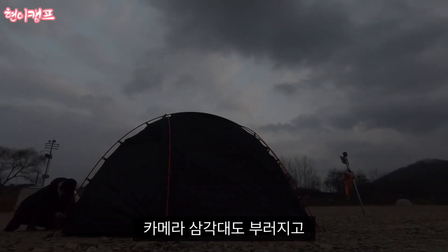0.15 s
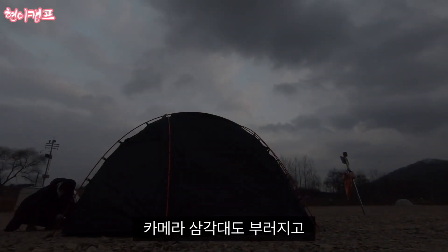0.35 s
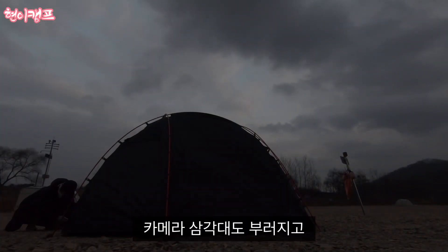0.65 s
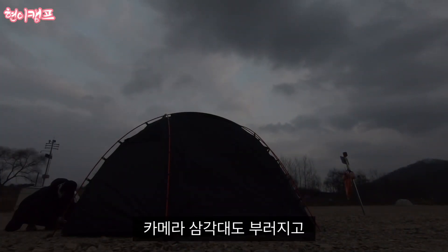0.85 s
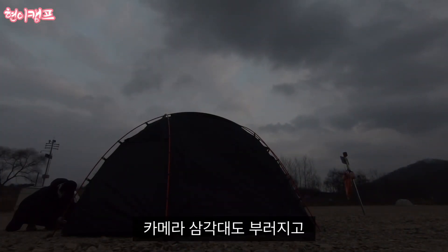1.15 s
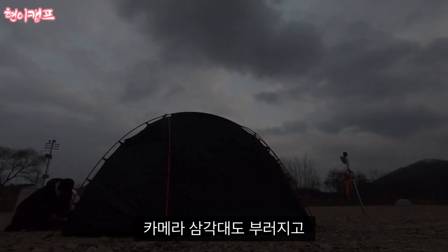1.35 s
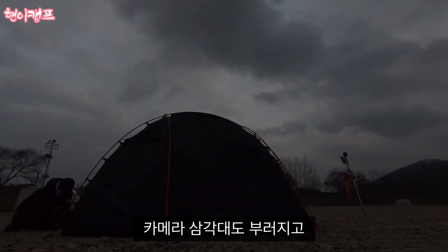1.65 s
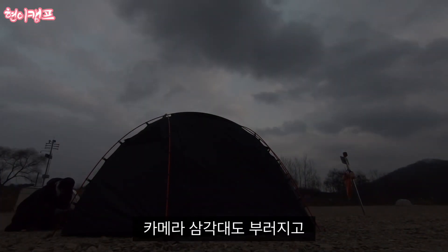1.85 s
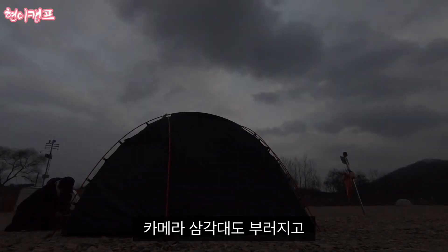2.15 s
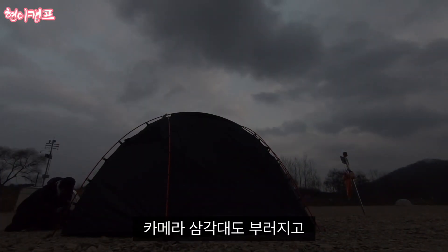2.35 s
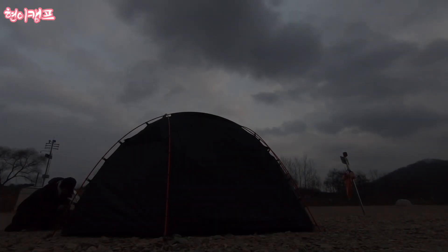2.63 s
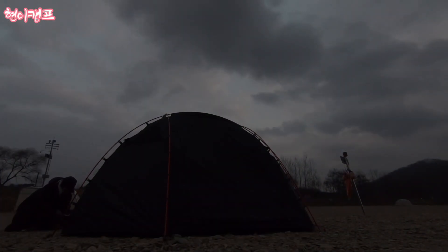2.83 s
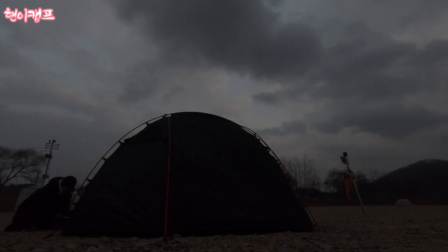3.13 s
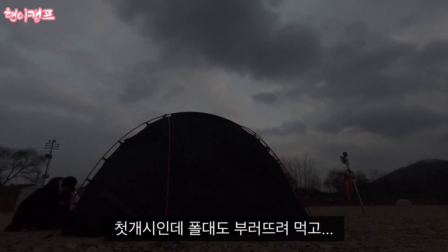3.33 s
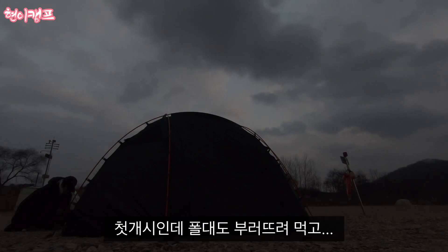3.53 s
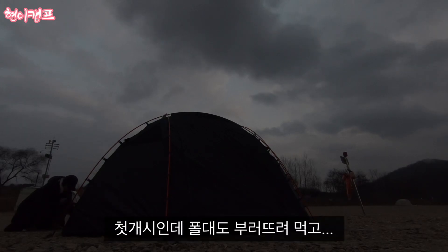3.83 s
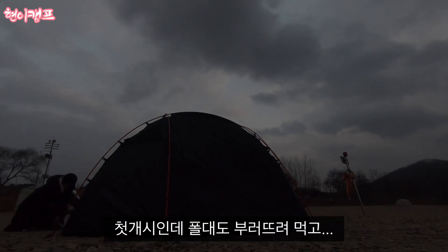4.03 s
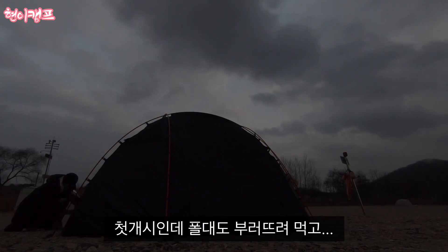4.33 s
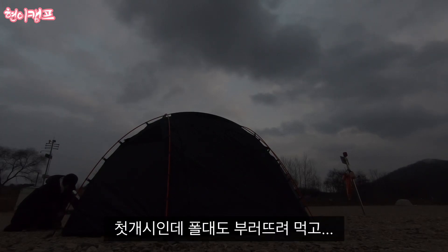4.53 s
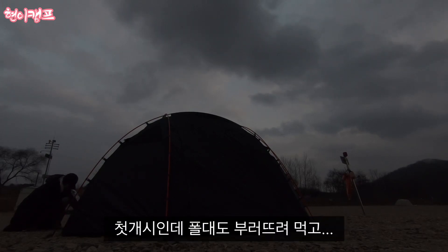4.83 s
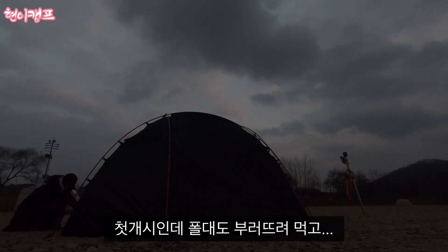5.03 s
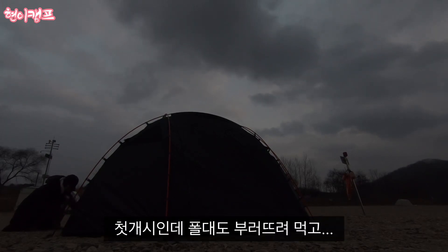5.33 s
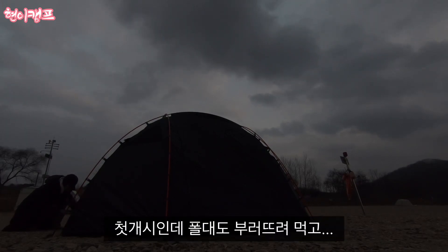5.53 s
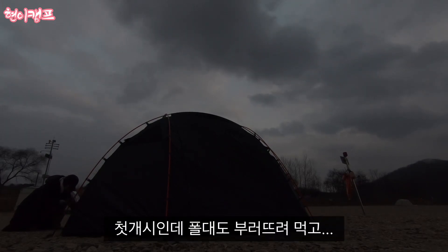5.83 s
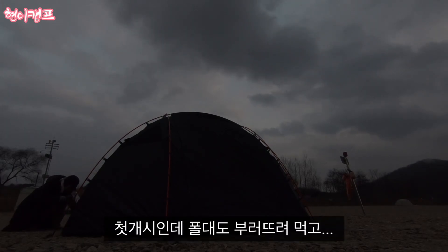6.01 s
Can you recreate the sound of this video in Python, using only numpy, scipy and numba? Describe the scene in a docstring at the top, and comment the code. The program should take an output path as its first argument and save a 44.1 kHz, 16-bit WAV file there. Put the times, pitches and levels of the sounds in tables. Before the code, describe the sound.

Outdoors, rumbling wind and gravel crunches drop suddenly at a click; a steel tent peg is then hammered steadily into stony ground amid gusts.

```python
"""Wind buffets the two microphone ports, the left one most, while gravel crunches.
At 1.36 s a click is heard, the wind noise is suddenly faint, then builds. A steel tent peg is hammered into
gravelly ground a few metres off on an open field: noise cracks, ringing steel modes, a soil thump, a short tail.
More gravel stirs between blows, a sleeve swishes with each swing, far traffic hums below; these and
the wind are shaped noise."""
import sys
import numpy as np
from scipy import signal
from scipy.fft import rfft, irfft
from scipy.io import wavfile
from numba import njit

SR = 44100
rng = np.random.default_rng(int(sys.argv[2]) if len(sys.argv) > 2 else 0)


def inscribe(sig):
    """Save sig as 16-bit PCM at rate SR to the path in sys.argv[1].

    A 1-D sig is mono; a 2-D sig holds one channel per row.
    Samples are clipped to [-1, 1] before scaling.
    """
    pcm = np.round(np.clip(np.atleast_2d(sig).T, -1, 1) * 32767)
    wavfile.write(sys.argv[1], SR, pcm.astype(np.int16))


N = 272097

STEP_S = 1.3616      # a click is heard and the wind noise is suddenly faint
# hammer blows: start_s [s], crack_db [dB], peg ring mid_db at 2-4 kHz [dB], high_db above 4 kHz [dB],
# hammer head ring head_db [dB], sleeve swish_db [dB]
BLOWS = [(1.7522, -26, -34, -33.5, -51.5, -69), (2.0845, -18, -33.5, -32.5, -50, -74),
         (2.4238, -22, -36, -27, -52, -71.5), (2.7483, -20.5, -45.5, -29, -56, -70),
         (3.0775, -21.5, -51, -29, -47.5, -72.5), (3.575, -20.5, -42.5, -34.5, -41.5, -66),
         (3.997, -18, -33, -33.5, -50, -63), (4.558, -20.5, -36, -45, -63.5, -69),
         (4.9835, -21.5, -37.5, -40.5, -47, -65.5), (5.4171, -20.5, -31.5, -34, -41.5, -69)]
# spectrum of steel striking steel, relative: pitch_hz [Hz], level_db [dB per Hz]
CRACK_SPECTRUM = [(350, -23), (600, 1.5), (900, -19.5), (1300, -8), (2000, -16), (2800, -3), (4000, -5.5),
                  (5300, -2.5), (7300, -5.5), (8600, -16.5), (10500, -17.5), (12400, -20), (13300, -45.5),
                  (16000, -56.5)]


def amp(db):
    """Amplitude factor for a level in dB."""
    return 10 ** (np.asarray(db) / 20)


def rms_one(x):
    """Signal scaled to rms 1."""
    return x / np.sqrt(np.mean(x ** 2) + 1e-20)


def in_time(rows):
    """Straight lines between table rows; the first column is time in s."""
    start_s, *columns = np.transpose(rows)
    return [np.interp(np.arange(N) / SR, start_s, column) for column in columns]


def at_hz(points, hz, axis=1):
    """A table column read at any pitch, in straight lines over log pitch."""
    points = np.array(points)
    return np.interp(np.log(hz), np.log(points[:, 0]), points[:, axis])


def pass_band(order, edge_hz, kind, x):
    """Butterworth filter, high pass or band pass."""
    return signal.sosfilt(signal.butter(order, edge_hz, kind, fs=SR, output="sos"), x)


def drift(rate_hz):
    """Slow chance with spread 1: noise through two equal low passes, computed at every 40th sample."""
    pole = np.exp(-80 * np.pi * rate_hz / SR)
    white = rng.standard_normal(N // 40 + 2002)
    slow = signal.lfilter([1], [1, -2 * pole, pole * pole], white)[2000:]      # skip the filter's start
    return np.interp(np.arange(N) / 40, np.arange(len(slow)), rms_one(slow))


def coloured(white, spectrum):
    """Noise given a spectrum; rms 1."""
    hz = np.maximum(np.fft.rfftfreq(N, 1 / SR), 1)
    return rms_one(irfft(rfft(white) * amp(at_hz(spectrum, hz)), N))


def clicks(times_s, sizes):
    """Single-sample clicks; the tiny floor keeps decaying filters off denormal numbers."""
    out = np.full(N, 1e-18)
    out[np.round(np.asarray(times_s) * SR).astype(int)] = sizes
    return out


def dying(x, t60_s):
    """Envelope that jumps at each click and falls by 60 dB in t60_s."""
    return signal.lfilter([1], [1, -amp(-60 / (t60_s * SR))], x)


def struck(times_s, levels_db, modes, spread_db, detune):
    """Every blow rings every mode with a strength, pitch and damping a little of its own."""
    out, t = np.zeros(N), np.arange(SR // 5) / SR
    mode_hz, mode_db, t60_s = np.transpose(modes)
    contact = 1 - np.exp(-t / 0.00021)      # the contact takes a moment
    chances = rng.standard_normal((len(times_s), 3, len(modes), 1))
    for start_s, level_db, (loud, sharp, long) in zip(times_s, levels_db, chances):
        fall_db = 60 * t / (t60_s[:, None] * amp(.5 * long))
        turns = mode_hz[:, None] * (1 + detune * sharp) * t
        ring_db = (level_db + mode_db)[:, None] + spread_db * loud - fall_db
        rings = amp(ring_db) * np.sin(2 * np.pi * turns)
        out[round(start_s * SR):][:len(t)] += contact * rings.sum(axis=0)
    return out


def crack_of_steel(start_s, hit, looseness):
    """Noise bursts: a sharp crack, then a ragged rattle of grit; a loose peg cracks thinly."""
    ragged = amp(4.8 * drift(180))      # grit shifts in fits and starts
    rattle = amp(-12.5) * dying(hit, .03) + amp(-18.5) * dying(hit, 0.11)
    burst = amp(-4.5) * dying(hit, 0.0041) + ragged * rattle
    full = coloured(rng.standard_normal(N), CRACK_SPECTRUM) * burst
    thin = pass_band(2, 1150, "high", full)
    return full + (thin - full) * np.interp(np.arange(N) / SR, start_s, looseness)


def peg_ring(start_s, low_db, mid_db, high_db):
    """Ringing modes of the steel peg; stones touch the shank and roughen its ring."""
    # modes of the peg: pitch_hz [Hz], level_db [dB, relative], t60_s [s]
    peg_modes = [(1245, -1, 0.05), (1320, -2.5, 0.013), (1413, -11, 0.046), (1565, -8.5, 0.01),
                 (1633, -6, 0.027), (1940, -10, 0.04), (2180, -8.5, 0.0092), (2737, -4.5, 0.082),
                 (2798, -3.5, .055), (3011, -6.5, 0.089), (3110, -8.5, 0.046), (3470, -8, 0.038),
                 (3540, -6, .05), (3680, -4, 0.019), (4430, -9.5, .04), (4760, -2, 0.023),
                 (4810, -8.5, 0.091), (5210, -1, 0.035), (5500, -9, 0.029), (6966, -3, 0.041),
                 (7210, -5.5, 0.032), (7600, -10.5, 0.023)]
    hz = np.array(peg_modes)[:, 0]
    upper_db = np.where(hz < 4000, mid_db[:, None], high_db[:, None])
    level_db = np.where(hz < 2000, low_db[:, None], upper_db)
    peg = struck(start_s, level_db, peg_modes, spread_db=2, detune=.004) * amp(2 * drift(100))
    return pass_band(3, [1000, 9500], "band", peg)


def head_ring(start_s, head_db):
    """High ring of the hammer head, its level wavering slightly."""
    # modes of the hammer head: pitch_hz [Hz], level_db [dB, relative], t60_s [s]
    head_modes = [(9212, 8.5, 0.066), (10100, -6.5, .04), (12000, -16, .06), (12400, -17.5, .06),
                  (14790, -27, .06)]
    return struck(start_s, head_db, head_modes, spread_db=3.5, detune=0.00087) * amp(0.93 * drift(60))


def soil_thump(start_s, thump_db):
    """Low, quickly damped modes of the soil, a moment after each contact."""
    # modes of the soil round the peg: pitch_hz [Hz], level_db [dB, relative], t60_s [s]
    ground_modes = [(184.2, -3.5, .07), (258, -7.5, 0.036), (454, -12.5, 0.023)]
    soil = struck(start_s + 0.0017, thump_db, ground_modes, spread_db=3.0, detune=.03)
    return pass_band(2, [110, 700], "band", soil)


def hammer():
    """Crack, peg and head ring with one ground echo, over a soil thump; the soil grips the sinking peg."""
    start_s, crack_db, mid_db, high_db, head_db, _ = np.transpose(BLOWS)
    sunk = np.arange(len(start_s))      # blows so far
    looseness = np.exp(-sunk / 2.65)
    full_thump_db, first_thump_db = -14.5, -38.5
    thump_db = full_thump_db + (first_thump_db - full_thump_db) * looseness
    low_db = -32 - 1.22 * sunk      # the soil damps the low ring
    hit = clicks(start_s, amp(crack_db))
    steel = crack_of_steel(start_s, hit, looseness) + peg_ring(start_s, low_db, mid_db, high_db)
    steel += head_ring(start_s, head_db)
    lag = round(0.0053 * SR)
    steel[lag:] += amp(-12.5) * steel[:-lag].copy()      # echo off the ground
    return steel + soil_thump(start_s, thump_db), hit


def scatter(hit):
    """Tent and ground scatter each blow into a short tail, different on each side."""
    swell = signal.lfilter([.006], [1, -.994], dying(hit, 0.082))
    return amp(-19.5) * swell * coloured(rng.standard_normal((2, N)), CRACK_SPECTRUM)


def gravel():
    """Each crunch is a decaying burst of ragged grit noise in a broad band, a quarter second at most."""
    # crunches: start_s [s], level_db before the band filter [dB], pitch_hz near mid-band [Hz], t60_s [s]
    crunches = [(0.218, -64, 4000, 0.97), (0.251, -42.5, 5370, 0.056), (.284, -56, 5440, 0.04),
                (0.299, -48, 4900, 0.02), (0.302, -43, 3230, 0.091), (0.325, -57, 3060, 0.12),
                (0.347, -53, 3580, 0.034), (0.463, -48.5, 5600, 0.025), (0.474, -64, 3650, 0.44),
                (.509, -62, 4000, 0.018), (0.648, -59, 5850, 0.094), (3.15, -60, 4000, 0.089),
                (4.159, -71.5, 6000, 0.24), (5.554, -66.5, 3070, 0.023), (5.888, -72, 3500, 0.15),
                (6.048, -71, 3500, 0.15)]
    grit = rng.standard_normal(N) * amp(2.5 * drift(300))
    out = np.zeros(N)
    for start_s, level_db, pitch_hz, t60_s in crunches:
        i = round(start_s * SR)
        piece = grit[i:i + SR // 4]
        band = pass_band(2, [pitch_hz / 1.45, pitch_hz * 1.6], "band", piece)
        fall_db = 60 * np.arange(len(piece)) / SR / t60_s
        out[i:i + len(piece)] += amp(level_db - fall_db) * band
    return out


def from_left(x):
    """The two ports hear the peg's corner with a level and phase gap that depend on pitch."""
    # sound from the left: pitch_hz [Hz], left_over_right_db [dB], left_lead_rad [rad]
    sides = [(100, 0, 0), (500, -1, .3), (950, 7.5, .4), (1900, 7, .1), (3800, 3.5, .1), (5500, 0, .8),
             (7500, -4.5, 1.9), (9200, -8, 2.1), (12000, -1, 2.6)]
    hz = np.maximum(np.fft.rfftfreq(N, 1 / SR), 1)
    # each port takes half of either gap
    half = amp(at_hz(sides, hz) / 2) * np.exp(.5j * at_hz(sides, hz, axis=2))
    return irfft(rfft(x) * np.array([half, 1 / half]), N)


@njit
def eddies(push, step, damping, smooth):
    """A broad resonance and two smoothing stages that follow the eddy pitch."""
    out, low, band, a, b = np.zeros(len(push)), 0., 0., 0., 0.
    for i in range(len(push)):
        band += step[i] * (push[i] - low - damping * band)
        low += step[i] * band
        a += smooth * step[i] * (low - a)
        b += smooth * step[i] * (a - b)
        out[i] = b / np.sqrt(step[i])
    return out


def buffeting(hz, lumps, lumps_db, damping, smooth, floor_hz):
    """Lumpy pressure on one port: stronger lumps come from faster eddies and are higher; rms 1."""
    push = rng.standard_normal(N) * amp(lumps_db * lumps)
    step = 2 * np.pi * hz * amp(0.75 * lumps + 0.77 * drift(14)) / SR      # rad per sample
    return rms_one(pass_band(1, floor_hz, "high", eddies(push, step, damping, smooth)))


def gusts():
    """Each gust is a bell-shaped change of level on both ports and on the sharp edge, in dB."""
    # gusts out of the rumble: start_s of the bell's middle [s], left_rise_db [dB], right_rise_db [dB],
    # sharp_db, extra sharp edge [dB]
    gust_rows = [(0.099, 7, 2, 0), (0.66, 9.5, 9, 9), (1.131, -1, 5.5, -5), (1.22, 2.5, -1, -5),
                 (2.3, -4.5, 18, 2.5), (2.72, 2, 1, 7.5), (2.86, 7, -0.5, 4.5), (3.17, 5, 1, 0.5),
                 (4.21, 7, -0.5, 10), (4.59, 3.5, 1.5, 9.5), (4.861, 1.5, -1, 7.5), (5.26, 2.5, 0, 5),
                 (5.73, 0, -0.5, 9.5), (5.891, 5.5, 7.5, 12), (6.05, 5, 6, -5)]
    middle_s, *rises_db = np.transpose(gust_rows)
    half_width_s = 0.046
    bells = np.exp(-((np.arange(N) / SR - middle_s[:, None]) / half_width_s) ** 2)
    return np.array(rises_db) @ bells


def wind():
    """Each port has its own eddies; the stereo widening puts each one, thin and inverted, on the other side."""
    # wind before and after the step in level, ahead of gusts: start_s [s], left_db [dB],
    # pitch_hz of left eddies before scaling [Hz], right_db [dB]
    wind_before = [(0.0, -34.5, 135, -43), (0.26, -29.5, 133, -48.5), (0.4, -31, 115, -49.5),
                   (0.52, -24.5, 108, -47), (0.76, -33.5, 128, -44), (0.88, -27.5, 110, -37),
                   (1.02, -33.5, 110, -43.5), (1.36, -24, 100, -33.5)]
    wind_after = [(1.362, -67, 60.14, -71.5), (1.84, -63, 45.02, -72), (1.97, -44, 45.1, -47),
                  (2.17, -31.5, 52, -42.5), (2.4, -32, 80.2, -37), (2.6, -34, 128.6, -49),
                  (2.93, -32, 111.8, -45), (3.15, -31, 104.1, -53), (3.25, -40.5, 109.8, -52),
                  (3.35, -27.5, 103, -58), (3.53, -39.5, 109.7, -56), (3.67, -30.5, 109.4, -48.5),
                  (3.87, -38, 118.2, -54.5), (4.0, -25, 126.4, -44), (4.2, -27.5, 142.7, -46.5),
                  (4.33, -41, 151.5, -58), (4.53, -31, 134.3, -50), (4.8, -35.5, 130.6, -60),
                  (5.05, -31.5, 128.9, -47), (5.4, -27, 116.4, -48), (5.65, -32, 150, -57.5),
                  (5.82, -31, 140.4, -51.5), (6.0, -26, 138.1, -43.5), (6.17, -23.5, 122.4, -46)]
    before = np.arange(N) / SR < STEP_S
    left_db, hz, right_db = np.where(before, in_time(wind_before), in_time(wind_after))
    left_rise_db, right_rise_db, sharp_db = gusts()
    left_db, right_db = left_db + left_rise_db, right_db + right_rise_db

    # sharp edge against the left port, stronger for fast eddies: 17.5 dB per octave
    edge_db = left_db - 28 + 17.5 * np.log2(hz / 124) + sharp_db
    left_hz = 1.151 * hz * 2 ** (.02 * sharp_db)      # sharper gusts are higher
    lumps = np.tanh(drift(43) / 2) * 2
    left = amp(left_db) * buffeting(left_hz, lumps, lumps_db=3.5, damping=0.67, smooth=0.95, floor_hz=66)
    left += amp(edge_db) * buffeting(250, lumps, lumps_db=4, damping=.8, smooth=1.5, floor_hz=200)

    right_hz = 70 * amp(0.2 * (right_db + 43.5))      # stronger wind is higher
    right_lumps = np.tanh(drift(23) / 2) * 2
    right = amp(right_db) * buffeting(right_hz, right_lumps, lumps_db=4.5, damping=0.27, smooth=2.4,
                                      floor_hz=25.4)
    across = pass_band(1, 600, "high", [right, left])
    return np.array([left, right]) - amp(-6) * across


def step_click():
    """A click: both channels swing negative ever faster, then step back to zero."""
    return -dying(clicks([STEP_S], amp(-33))[::-1], 0.015)[::-1]


def wide(spectrum, alike, flicker_db):
    """Noise on both sides with correlation alike, gently flickering."""
    mid, side = coloured(rng.standard_normal((2, N)), spectrum) * amp(flicker_db * drift(17))
    return np.sqrt(1 + alike) * mid + np.sqrt(1 - alike) * side * [[1], [-1]]


def sleeve():
    """Cloth noise that swells with the downswing and fades as the arm comes back, over a faint stirring."""
    # cloth stirring: start_s [s], level_db [dB]
    stirring = [(0, -71.5), (.12, -89.5), (.45, -79.5), (.67, -83.5), (.9, -90), (1.3, -85), (3.3, -86.5),
                (5.4, -87), (5.9, -86), (6.17, -82)]
    # spectrum of rubbing cloth, relative: pitch_hz [Hz], level_db [dB per Hz]
    cloth_spectrum = [(880, -29.5), (1500, -0.5), (1950, -5), (2210, -4.5), (2550, -6), (4950, -3),
                      (10100, -17.5), (15000, -37)]
    start_s, swish_db = np.transpose(BLOWS)[[0, 5]]
    swing = dying(clicks(start_s, amp(swish_db))[::-1], 0.18)[::-1]      # reversed in time: swells
    recoil = dying(clicks(start_s, amp(swish_db - 12.5)), 0.53)
    level = amp(in_time(stirring)[0]) + swing + recoil
    return level * wide(cloth_spectrum, alike=0.069, flicker_db=1.5)


def far_traffic():
    """Low hum of far traffic as wide coloured noise, a little stronger on the right."""
    # spectrum of far traffic, relative: pitch_hz [Hz], level_db [dB per Hz]
    field_spectrum = [(15, -45), (25, -9.5), (108, -6), (205, 9), (306, -3), (421, -4), (592, -15.5),
                      (644, -6.5), (1120, -11.5), (2210, -33.5), (4000, -33.5), (5200, -52.5), (8800, -120)]
    level_db = np.where(np.arange(N) / SR < STEP_S, -65.5, -65)
    hum = wide(field_spectrum, alike=0.022, flicker_db=1.4)
    return amp(level_db) * hum * amp([[-.8], [.8]])


def scene():
    """Hammering and gravel from the left, in wind, over cloth and traffic."""
    blows, hit = hammer()
    peg_corner = from_left(blows + gravel()) + scatter(hit)
    return peg_corner + wind() + step_click() + sleeve() + far_traffic()


def record(dry):
    """The top is cut: 70 dB down from 16.4 kHz up."""
    return signal.sosfilt(signal.cheby2(12, 70, 16400, fs=SR, output="sos"), dry)


dry = scene()
out = record(dry)
inscribe(out)
```